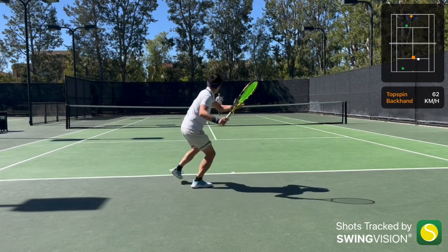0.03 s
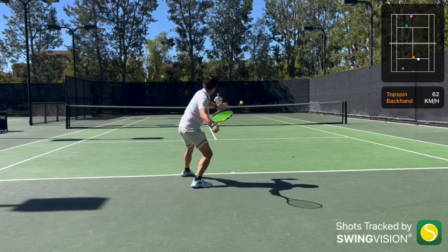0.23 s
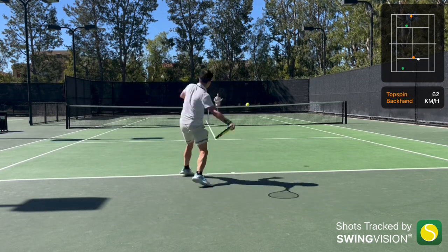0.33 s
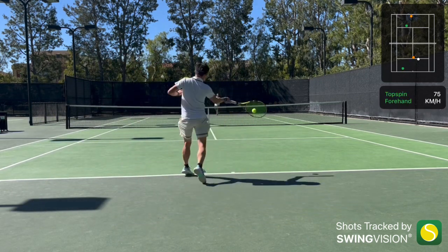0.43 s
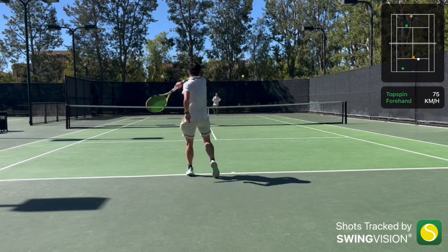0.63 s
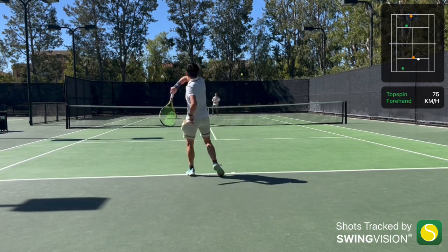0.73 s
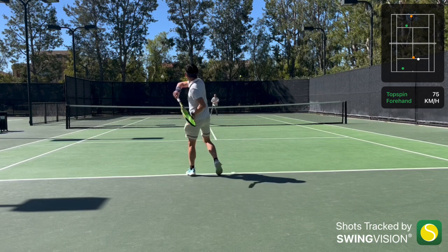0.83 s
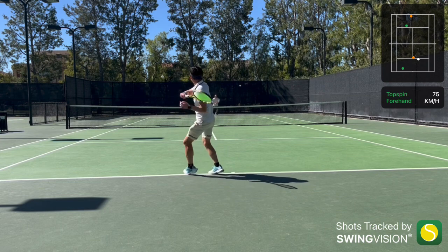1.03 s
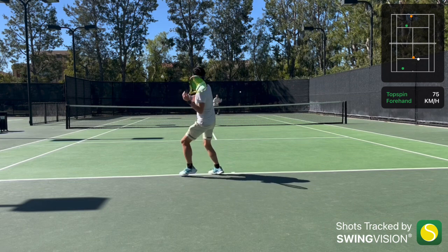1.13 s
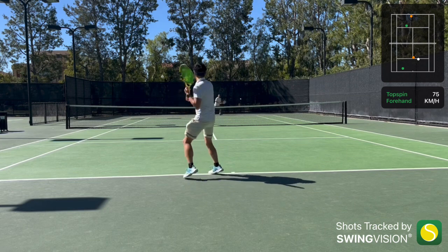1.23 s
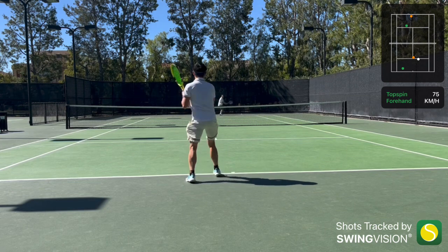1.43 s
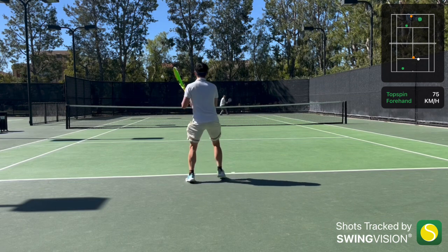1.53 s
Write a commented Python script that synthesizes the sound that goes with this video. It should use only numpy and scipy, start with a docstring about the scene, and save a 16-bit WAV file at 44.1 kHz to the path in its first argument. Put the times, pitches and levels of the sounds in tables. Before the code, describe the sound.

A tennis racket hits a ball at about 0.44 s: one loud, short, woody crack with a hollow pop and brief stringy ring, then a faint scattered outdoor echo under a second long. Gritty soles scuff from 0.25 to 0.6 s, with a squeaky-dry bite near 0.7 and soft steps around 0.8-1.0 and 1.33. Low traffic hum, faint early chirps, leaf hiss; a distant return hit at 1.54.

```python
"""Racket stroke on a hard court

A racket strikes a ball: strings and frame ring under a noise crack, then the ball pops off as dying sines.
Fences answer with sparse decaying taps. Shoes scuff (grains) and tap (noise knocks over low thuds).
Far traffic, shaped noise over a wavering low hum, leans left in its bass; birds whistle as gliding sines
over leaf noise. The right channel's treble is turned in phase against the left."""
import sys
import numpy as np
from scipy import signal
from scipy.fft import rfft, irfft
from scipy.io import wavfile
from scipy.ndimage import uniform_filter1d

SR = 44100
rng = np.random.default_rng(int(sys.argv[2]) if len(sys.argv) > 2 else 0)


def volts(x):
    """Linear amplitude factor 10**(x/20) for a level x in dB, scalar or array-like."""
    e = np.asarray(x, float) / 20
    return 10 ** e


def master(y):
    """Save y as 16-bit WAV."""
    cut = np.clip(np.atleast_2d(y).T, -1, 1)
    pcm = np.round(cut * 32767)  # scale
    wavfile.write(sys.argv[1], SR, pcm.astype(np.int16))


N = 70560

# Far traffic wash, relative spectrum: f/Hz, level/dB
WASH_COLOUR = [(18, -58), (30, -27), (53, -3.5), (74, -19), (89, -12), (105, -36.5), (157, -13),
               (271, -22.5), (381, -24.5), (788, -31), (1110, -35.5), (2240, -42.5), (2810, -42),
               (6800, -53), (8840, -83), (15000, -120)]
WASH_DB, PATCHES_DB = -41, 1.32
# Likeness of the channels for far sources: f/Hz, likeness
FAR_LIKENESS = [(0, 1), (300, 0.9), (900, 0.48), (1800, 0.85), (2700, 0.12), (5000, 0.94), (7500, 0.31)]
# Phase of right against left in the wash: f/Hz, phase/rad
WASH_PHASE = [(0, 0), (400, 1.67), (1000, 4.5), (1600, 4.5), (1850, 5), (4500, 4.5), (5500, 10), (7500, 10)]
# Balance of the wash: f/Hz, left over right/dB
WASH_BALANCE = [(0, 2.5), (900, -0.5), (1500, -3), (2500, 0), (4500, 11.5), (6500, 3.5), (7500, -5)]
# Low drone as noise bands, before tilt: f/Hz, width/Hz, level/dB
DRONE_BANDS = [(71.8, 50, -47), (153.2, 12.4, -52)]
# Pitch and level of one stretch of narrow-band low hum, before tilt: t/s, f/Hz, level/dB rms
HUM_PATH = [(0.0, 71.7, -39.5), (0.102, 74.25, -53.5), (0.212, 70.95, -32.5), (0.258, 73.7, -55),
            (0.283, 70.1, -34), (0.328, 68.4, -51.5), (0.4, 76.32, -42.5), (0.588, 71.8, -41.5),
            (0.647, 67.74, -41), (0.73, 75.8, -49.5), (0.953, 75.85, -38), (0.984, 77.3, -67),
            (1.01, 75.63, -39), (1.216, 75.5, -44.5), (1.31, 74.1, -35), (1.386, 68.64, -49),
            (1.488, 73.6, -58), (1.6, 69, -39)]
DRONE_TILT_DB = 0.7  # left up, right down

# Lower bird calls, one list each: t/s, f/Hz, level/dB rms before burr and octave
WHISTLE_PATHS = [
    [(0.03, 2274, -61), (0.042, 2520, -61), (0.058, 2567, -50), (0.066, 2770, -57), (0.072, 2890, -57),
     (0.077, 2300, -50), (0.082, 2050, -64)],
    [(0.115, 2570, -64), (0.124, 2580, -51), (0.133, 2430, -58.5), (0.163, 2463, -53.5), (0.171, 2630, -58),
     (0.177, 2240, -51), (0.185, 2220, -71)],
    [(0.23, 2490, -68.5), (0.236, 2525, -56), (0.244, 2440, -58), (0.259, 2554, -51.5), (0.266, 2750, -60),
     (0.272, 3200, -62), (0.277, 2620, -57), (0.285, 2290, -55), (0.292, 2150, -65)],
]
# Thin bird sweeps: start/s, length/s, from f/Hz, to f/Hz, peak level/dB
SWEEPS = [(.29, .04, 6600, 5500, -64), (1.345, .045, 4600, 6200, -66), (1.495, .065, 4300, 6300, -65),
          (1.55, .035, 4700, 4600, -65)]
# Many far birds merged into a band: f/Hz, level/dB
TWITTER_COLOUR = [(2200, -22), (2550, -1.5), (2900, -7), (3250, -30.5)]
TWITTER_DB, OCTAVE_DB, BURR_RMS, FLUTTER_RMS_HZ = -68, -19, 0.19, 120
BIRDS_LEFT_DB, BIRDS_PHASE_RAD = 5, -0.3

# Leaf noise, relative spectrum: f/Hz, level/dB
LEAF_COLOUR = [(4000, -15), (5200, 8), (6500, -18), (8000, -11), (10000, -12), (13000, -16.5), (16000, -21)]
LEAVES_DB, LEAF_SWELL_DB = -69.5, 0.54

# Scuffs of soles; the first row is a brief swell of the leaf noise:
# start/s, length/s, hiss level/dB, rub re hiss/dB (RUB_DB added)
SCUFF_ROWS = [(-.02, 0.078, -73, 1), (0.259, 0.075, -69.5, 15), (0.359, 0.09, -52.5, 3.5),
              (0.446, 0.069, -46.5, 7.5), (0.501, 0.092, -38.5, -7), (0.628, 0.044, -62, 9),
              (0.692, 0.048, -48, -2), (0.791, 0.061, -64.5, 13.5), (0.844, 0.094, -65.5, 9.5),
              (0.914, 0.03, -55.5, -5), (0.934, 0.05, -52.5, 2), (0.973, 0.048, -66, -2),
              (1.318, 0.045, -71.5, 8)]
# Upper and lower grit spectra: f/Hz, level/dB
HISS_COLOUR = [(1500, -26), (3000, -3), (5000, -2.5), (7000, 2), (8500, 0.5), (9800, -0.5), (12500, -8),
               (14000, -7), (16000, -21)]
RUB_COLOUR = [(200, -4), (500, -4), (1100, 0.5), (2000, -11), (4000, -16.5), (8000, -44)]
SCUFF_RISE_PART, SCUFF_FALL_PART, GRAINS_PER_S, RUB_DB = 0.16, 0.4, 6000, -2.5
# A sole biting the grit: f/Hz, level/dB
BITE_COLOUR = [(6000, -10), (9500, 4), (13000, -11), (16000, -4)]
BITE_S, BITE_RISE_S, BITE_DB, BITE_T60_S = .6868, .004, -43.5, 0.12
# Soles set down: t/s, knock level before rise and decay/dB, knock f/Hz, thud re that level/dB
FOOTFALLS = [(.233, -38.5, 794, 8.5), (.372, -38.5, 1900, -9), (.377, -38.5, 1900, -7),
             (0.796, -46, 900, 5), (.906, -43.5, 916, 16), (.916, -42.5, 1010, -8), (.942, -47, 1000, 0),
             (.955, -47, 900, -10), (1.335, -50, 802, -12)]
# Knock spectrum: multiple of knock f, level/dB
KNOCK_COLOUR = [(.2, -5), (.5, 3), (1, 5.5), (2, -12), (3.2, -10), (10, -43)]
KNOCK_RISE_S, KNOCK_T60_S, THUD_HZ, THUD_T60_S = 0.00083, 0.025, 185, 0.039

# Decay of the fences' answer: f/Hz, t60/s
FENCE_DECAY = [(200, 0.47), (500, 0.91), (1000, 1), (2000, 0.43), (5000, 0.41), (12000, 0.23)]
# What the fences send back: f/Hz, level/dB
FENCE_COLOUR = [(150, 4), (320, -4.5), (480, 10), (700, -13), (900, -8.5), (1050, -2.5), (2000, 4),
                (5000, 1), (12000, -4.5)]
# Single returns: delay/s, level/dB
SINGLE_RETURNS = [(0.041, -33), (.058, -30), (.075, -42), (0.111, -35)]
FENCES_DB, FENCES_START_S = -18.5, 0.0077

# Strings and frame from contact, STRIKE_DB added: f/Hz, level/dB, t60 while in contact/s, rise/s
RACKET_MODES = [(627, -8.5, 0.027, 0.002), (726, 0, 0.041, 0.0038), (1084, -8, 0.04, 0.0027),
                (1482, -15, 0.033, 0.0014), (1203, -8, 0.041, 0.0012), (1923, 0.5, 0.027, .004),
                (2340, -12, 0.046, 0.0014), (2520, -14, 0.049, 0.002), (3210, -16, 0.022, 0.0005),
                (3602, -14, 0.03, 0.000443), (4300, -15.5, 0.033, 0.0014), (4660, -11.5, 0.03, 0.0023),
                (5840, -11.5, 0.025, 0.0019)]
# Ball shell and its air from release, STRIKE_DB added: f/Hz, level/dB, t60/s, rise/s
BALL_MODES = [(157, -31, 0.029, 0.0011), (252.6, 6, 0.02, 0.00055), (912, 8.5, 0.022, 0.0022),
              (2210, -23, 0.032, 0.0028), (3200, -18, 0.049, 0.0011)]
# Frame humming on from release: f/Hz, level/dB, t60/s, rise/s
FRAME_MODES = [(240, -25, .22, .05), (340, -31, .18, .03), (466, -29, .3, .06), (727, -29, .15, .003),
               (985, -36, .35, .02)]
# Crack spectrum: f/Hz, level/dB
CRACK_COLOUR = [(800, 0), (2000, -4), (5000, -6.5), (7000, -9.5), (8500, -4), (11000, -11), (14000, -16),
                (16000, -16)]
STRIKE_S, CONTACT_S, STRIKE_DB = .4415, .0046, -10
RELEASE_T60_S = 0.044  # extra string damping once the ball has left
CRACK_DB, CRACK_T60_S, CRACK_RISE_S = -18, 0.032, 0.00069
SQUASH_DB, SQUASH_FROM_HZ, SQUASH_TO_HZ, SQUASH_SAG_S, SQUASH_T60_S = -13, 1513, 297, .002, 0.036
# Return stroke's colour after the distance: f/Hz, level/dB
FAR_COLOUR = [(150, -10), (600, -3), (1000, 0.5), (1800, -3), (3000, 4), (4000, -4), (6000, -24)]
FAR_STRIKE_S, FAR_STRIKE_DB, FAR_T60_S = 1.5418, -23, .025

# Likeness between left and right, before the blur exponent: f/Hz, likeness
STEREO_LIKENESS = [(0, 0.91), (1000, 0.71), (3000, 0.78), (5500, 0.52), (7600, 0.7), (8000, 0.95),
                   (9000, 0.89), (10000, 0.62), (11200, 0.93), (13100, 0.78), (13900, 0.64), (14900, 0.74)]
# Phase between left and right: f/Hz, phase/turns
STEREO_PHASE = [(0, 0), (5300, 0), (7100, .24), (8100, .5), (8950, .5), (10500, .85), (11300, 1),
                (13100, 1), (15000, 1.5)]
LOW_CUT_HZ = 45.4


def evened(x):
    """Scales to unit rms."""
    return x / np.sqrt(np.mean(x ** 2) + 1e-20)


def read(points, hz, log=True):
    """Interpolates a curve over log or linear frequency."""
    f, value = np.transpose(points)
    if log:
        return np.interp(np.log(hz + 1), np.log(f + 1), value)
    return np.interp(hz, f, value)


def add(mix, s, sound):
    """Adds sound into mix at s seconds, cut at the end."""
    part = mix[round(s * SR):][:len(sound)]
    part += sound[:len(part)]


def colour(x, points):
    """Filters by a (f/Hz, level/dB) curve."""
    hz = np.fft.rfftfreq(len(x), 1 / SR)
    return irfft(rfft(x) * volts(read(points, hz)), len(x))


def coloured_noise(n, points):
    """White noise filtered by a curve, at unit rms."""
    return evened(colour(rng.standard_normal(n), points))


def ring(modes, length_s=.4):
    """Sum of dying sines, each with its own soft start."""
    t = np.arange(0, length_s, 1 / SR)
    out = np.zeros(len(t))
    for hz, db, t60, rise in modes:
        envelope = volts(db - 60 * t / t60) * (1 - np.exp(-t / rise))
        out += envelope * np.sin(2 * np.pi * hz * t)
    return out


def spread(x, likeness, radians, left_db=0., blur=0.97):
    """Right channel: the left turned in phase, blended with a scrambled copy where likeness is low."""
    hz, _, left = signal.stft(np.pad(x, 512, "reflect"), SR, nperseg=256, noverlap=192)
    same = np.clip(read(likeness, hz, False), 0, 1)[:, None] ** blur
    phase_walk = np.cumsum(rng.standard_normal(left.T.shape), 0).T
    blend = same + np.sqrt(1 - same ** 2) * np.exp(1j * phase_walk)
    right = left * np.exp(1j * radians(hz))[:, None] * blend
    pair = np.array([left * volts(left_db / 2), right / volts(left_db / 2)])
    return signal.istft(pair, SR, nperseg=256, noverlap=192)[1][:, 512:N + 512]


def treble_radians(hz):
    """Phase turn of the right channel's treble."""
    return 2 * np.pi * read(STEREO_PHASE, hz, False)


def birds_radians(hz):
    """Constant phase between the channels."""
    return BIRDS_PHASE_RAD + 0 * hz


def wash():
    """Far traffic: broad stereo noise with faint patches of level in time and frequency."""
    hz = np.fft.rfftfreq(1024, 1 / SR)
    a, b, c, d, patches = rng.standard_normal((N // 256 + 5, 513, 5)).T
    patches = evened(uniform_filter1d(uniform_filter1d(patches, 12, 0), 12, 1))
    same = np.clip(read(FAR_LIKENESS, hz, False), 0, 1)[:, None]
    left = a + 1j * b
    right = same * left + np.sqrt(1 - same ** 2) * (c + 1j * d)
    right = right * np.exp(1j * read(WASH_PHASE, hz, False))[:, None]
    tilt = volts(read(WASH_BALANCE, hz, False) / 2)[:, None]
    level = volts(read(WASH_COLOUR, hz)[:, None] + PATCHES_DB * patches)
    z = np.array([left * tilt, right / tilt]) * level
    return volts(WASH_DB) * evened(signal.istft(z, nperseg=1024, noverlap=768)[1][:, :N])


def drone():
    """Low bands of noise through resonance-shaped filters."""
    f = np.fft.rfftfreq(N, 1 / SR)
    out = np.zeros(N)
    for mid_hz, width_hz, db in DRONE_BANDS:
        band = (1 + ((f - mid_hz) / width_hz) ** 2) ** 2
        out += volts(db) * evened(irfft(rfft(rng.standard_normal(N)) / band, N))
    return out


def hum():
    """Narrow-band low hum: a sine following one path of pitch and level."""
    s, hz, db = np.transpose(HUM_PATH)
    t = np.arange(N) / SR
    turns = np.cumsum(np.interp(t, s, hz)) / SR + rng.random()
    return np.sqrt(2) * volts(np.interp(t, s, db)) * np.sin(2 * np.pi * turns)


def birds():
    """Burred whistles with a weak octave and thin sweeps that level off, over a twitter band."""
    out = volts(TWITTER_DB) * coloured_noise(N, TWITTER_COLOUR)
    for call in WHISTLE_PATHS:
        s, hz, db = np.transpose(call)
        t = np.arange(s[0], s[-1], 1 / SR)
        phase = 2 * np.pi * np.cumsum(np.interp(t, s, hz)) / SR
        burr = 1 + BURR_RMS * evened(uniform_filter1d(rng.standard_normal(len(t)), 150))
        tone = np.sin(phase) + volts(OCTAVE_DB) * np.sin(2 * phase)
        level = np.sqrt(2) * volts(np.interp(t, s, db))
        add(out, s[0], level * burr * tone * signal.windows.tukey(len(t), .2))
    for start, length, from_hz, to_hz, db in SWEEPS:
        u = np.arange(0, length, 1 / SR) / length
        hz = from_hz + (to_hz - from_hz) * np.sin(np.pi * u / 2) ** 3.9
        hz += FLUTTER_RMS_HZ * evened(uniform_filter1d(rng.standard_normal(len(u)), 60))
        add(out, start, volts(db) * np.sin(np.pi * u) * np.sin(2 * np.pi * np.cumsum(hz) / SR))
    return colour(out, [(7000, 0), (8000, -50)])


def leaves():
    """Leaf noise whose level swells slowly and slightly."""
    swell = evened(uniform_filter1d(uniform_filter1d(rng.standard_normal(N), 3000), 3000))
    return volts(LEAVES_DB + LEAF_SWELL_DB * swell) * coloured_noise(N, LEAF_COLOUR)


def shoes():
    """Grains hiss and rub in each scuff and the first leaf swell; a sole bites; steps knock and thud."""
    grit = (rng.random(N) < GRAINS_PER_S / SR) * rng.standard_normal(N)
    hiss = evened(colour(grit, HISS_COLOUR))
    rub = evened(colour(grit, RUB_COLOUR))
    out = np.zeros(N)
    for start, length, db, rub_db in SCUFF_ROWS:
        u = (np.arange(N) / SR - start) / length
        envelope = np.clip(np.minimum(u / SCUFF_RISE_PART, (1 - u) / SCUFF_FALL_PART), 0, 1)
        out += volts(db) * envelope * (hiss + volts(RUB_DB + rub_db) * rub)
    t = np.arange(0, .1, 1 / SR)
    bite = coloured_noise(len(t), BITE_COLOUR) * np.minimum(t / BITE_RISE_S, 1)
    add(out, BITE_S, volts(BITE_DB - 60 * t / BITE_T60_S) * bite)
    t = np.arange(0, .06, 1 / SR)
    for s, db, hz, thud_db in FOOTFALLS:
        knock = coloured_noise(len(t), [(k * hz, d) for k, d in KNOCK_COLOUR])
        knock *= volts(db - 60 * t / KNOCK_T60_S) * (1 - np.exp(-t / KNOCK_RISE_S))
        thud = ring([(THUD_HZ, db + thud_db, THUD_T60_S, .001)], .06)
        add(out, s, knock + thud)
    return out


def fences(x):
    """Sparse taps of random sign, each band dying at its own speed, and a few single returns."""
    taps = np.zeros(SR)
    at = np.arange(0, SR - 20, 20) + rng.integers(0, 20, SR // 20 - 1)
    taps[at] = rng.choice([-1., 1.], at.shape)
    taps *= np.clip(np.arange(SR) / SR / FENCES_START_S - 1, 0, 1)  # full at twice the start time
    hz, t, z = signal.stft(taps, SR, nperseg=256)
    decay = volts(-60 * t / read(FENCE_DECAY, hz)[:, None])
    tail = signal.istft(z * decay, SR, nperseg=256)[1]
    tail *= volts(FENCES_DB) / np.linalg.norm(tail)
    for s, db in SINGLE_RETURNS:
        tail[round(s * SR)] += volts(db)
    return signal.fftconvolve(colour(x, FENCE_COLOUR), tail)[:N]


def strike():
    """Strings and frame ring from contact under a crack and a falling thump; the ball pops on leaving."""
    out, t = np.zeros(N), np.arange(0, .05, 1 / SR)
    crack = coloured_noise(len(t), CRACK_COLOUR)
    add(out, STRIKE_S, crack * volts(CRACK_DB - 60 * t / CRACK_T60_S) * (1 - np.exp(-t / CRACK_RISE_S)))
    damping_db = 60 * np.maximum(t - CONTACT_S, 0) / RELEASE_T60_S
    add(out, STRIKE_S, volts(STRIKE_DB - damping_db) * ring(RACKET_MODES, .05))
    # the flattened ball's thump, falling in pitch
    hz = SQUASH_TO_HZ + (SQUASH_FROM_HZ - SQUASH_TO_HZ) * np.exp(-t / SQUASH_SAG_S)
    squash = (1 - np.exp(-t / SQUASH_SAG_S)) * np.sin(2 * np.pi * np.cumsum(hz) / SR)
    add(out, STRIKE_S, volts(SQUASH_DB - 60 * t / SQUASH_T60_S) * squash)
    add(out, STRIKE_S + CONTACT_S, ring(FRAME_MODES) - volts(STRIKE_DB) * ring(BALL_MODES))
    return out


def far_strike(hit):
    """Return stroke from across the net: the near strike damped, weakened and recoloured."""
    t = np.arange(4410) / SR
    stroke = hit[round(STRIKE_S * SR):][:4410]
    return colour(stroke * volts(FAR_STRIKE_DB - 60 * t / FAR_T60_S), FAR_COLOUR)


def scene():
    """Sums the near, reflected and far layers in stereo."""
    hit, feet = strike(), shoes()
    add(hit, FAR_STRIKE_S, far_strike(hit))
    near = spread(hit, STEREO_LIKENESS, treble_radians, blur=0.33)
    near = near + spread(feet, STEREO_LIKENESS, treble_radians)
    wide = spread(leaves() + fences(hit + feet), STEREO_LIKENESS, treble_radians, blur=4.7)
    trees = spread(birds(), FAR_LIKENESS, birds_radians, BIRDS_LEFT_DB, blur=0.11)
    tilt = volts(np.array([[DRONE_TILT_DB], [-DRONE_TILT_DB]]))
    traffic = wash() + (drone() + hum()) * tilt
    return near + wide + trees + traffic


def roll_off(x):
    """The treble ends steeply here."""
    return signal.sosfilt(signal.butter(12, 15790, fs=SR, output="sos"), x)


def record(dry):
    """The microphone drops the deepest bass."""
    low_cut = signal.butter(4, LOW_CUT_HZ, "high", fs=SR, output="sos")
    mix = signal.sosfilt(low_cut, dry)
    return roll_off(mix)


dry = scene()
out = record(dry)
master(out)
```